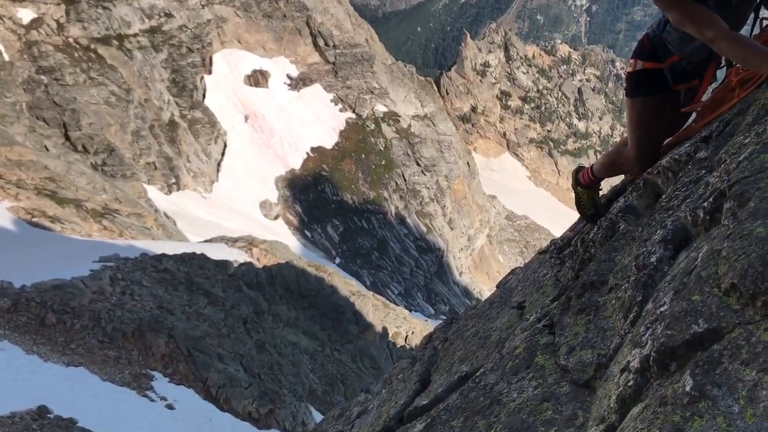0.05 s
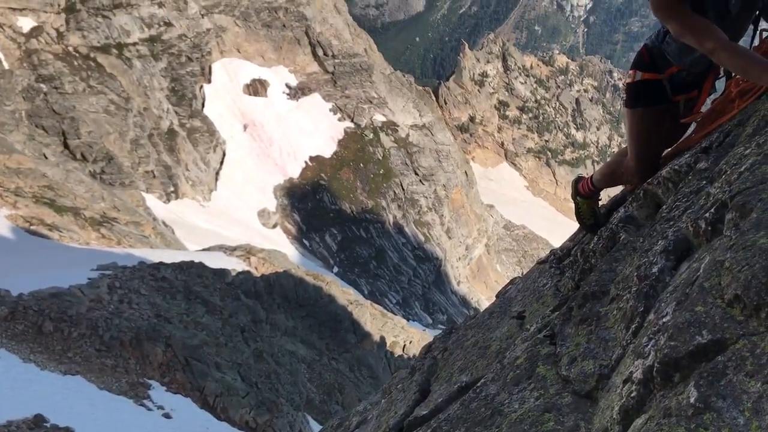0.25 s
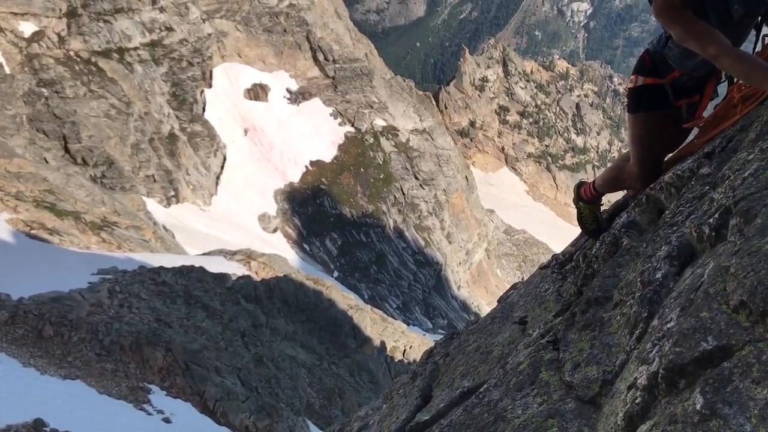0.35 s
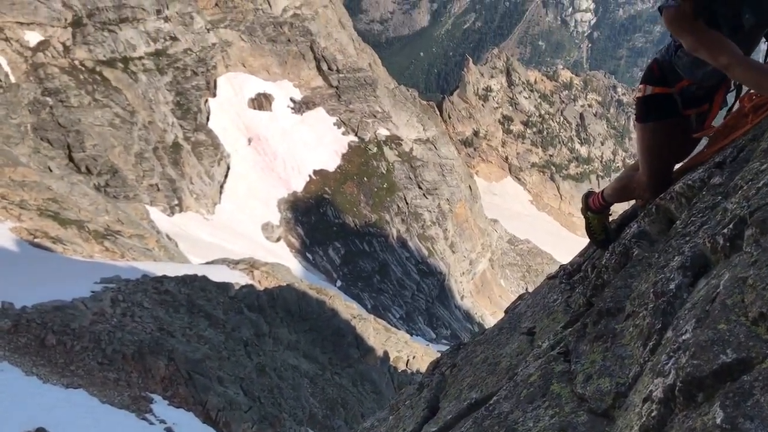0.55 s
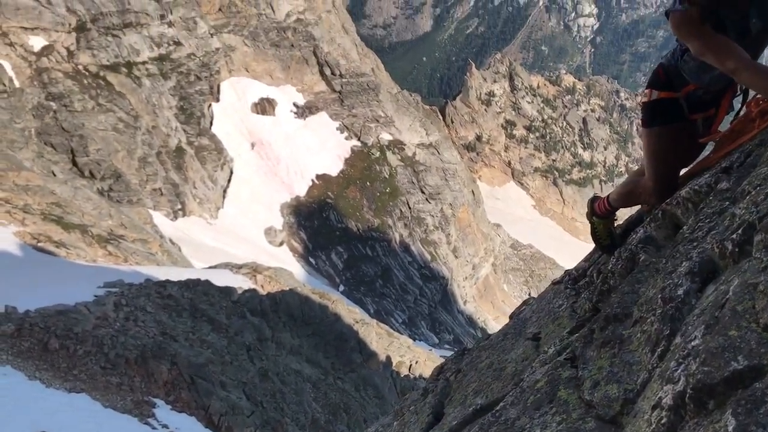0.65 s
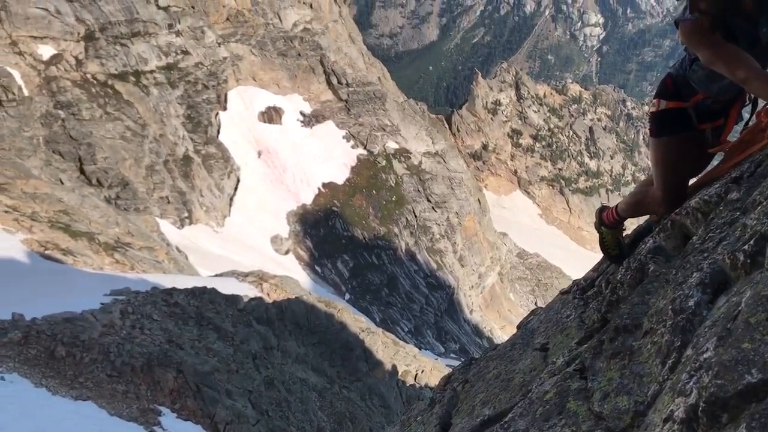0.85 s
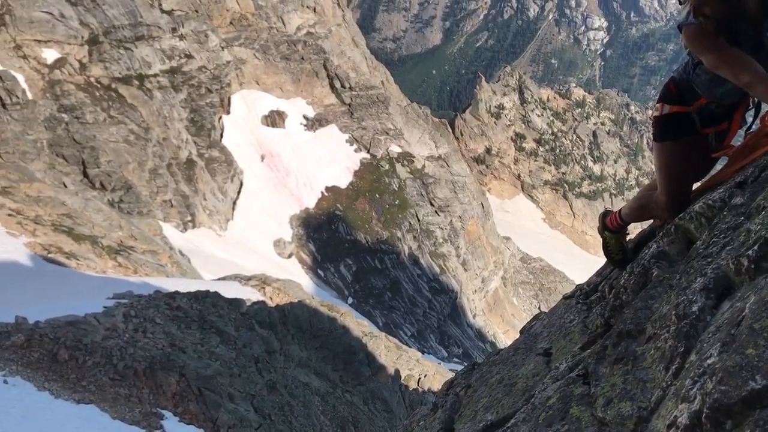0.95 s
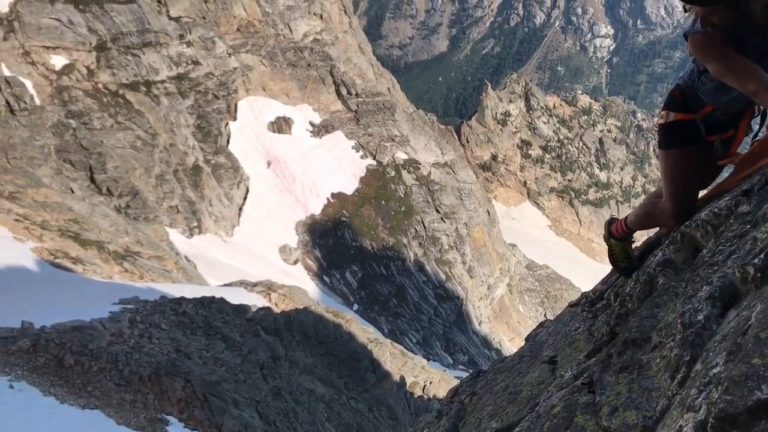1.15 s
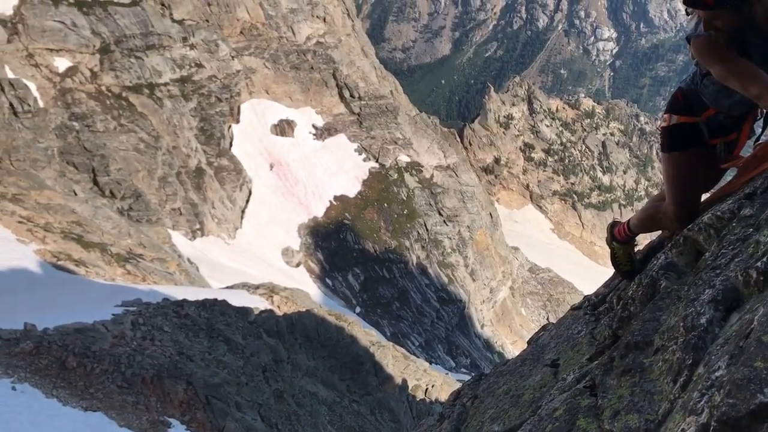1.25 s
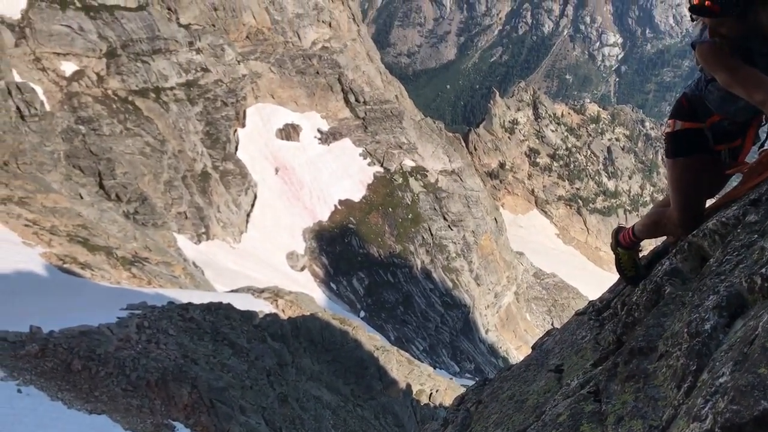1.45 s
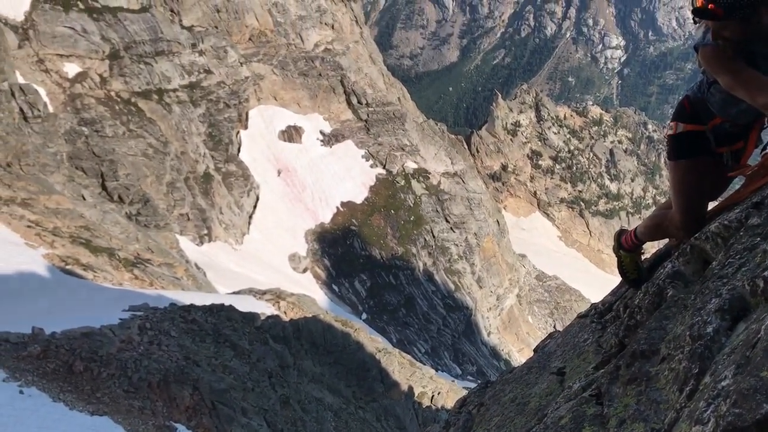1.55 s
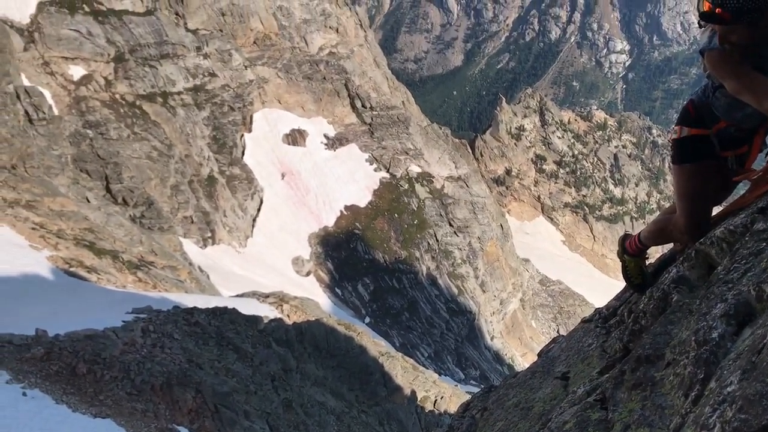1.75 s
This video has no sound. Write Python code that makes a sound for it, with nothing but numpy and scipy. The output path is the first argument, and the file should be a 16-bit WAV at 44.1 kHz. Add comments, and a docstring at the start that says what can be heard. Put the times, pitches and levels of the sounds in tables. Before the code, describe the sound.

Loose rocks knock and scrape on a mountain slope. A sharp clack starts a quick clatter with dull thuds and crunching grit, then a lone clack and a sparser cluster follow. The sound is fairly close, with faint wind behind.

```python
"""Loose rocks on a mountain slope

Blocks knock and ring briefly, small stones clack, and the rubble thuds as it takes the weight.
Sliding faces grind or rub; between them grit snaps and crushed sand sprays out.
Every contact scatters briefly among the boulders. A faint wind and an even hiss lie behind."""
import sys
import numpy as np
from scipy import signal
from scipy.fft import rfft, irfft
from scipy.io import wavfile

SR = 44100
rng = np.random.default_rng(int(sys.argv[2]) if len(sys.argv) > 2 else 0)


def wav_record(signal):
    """Record a signal, one row per channel, as 16-bit PCM in the file named by sys.argv[1]."""
    frames = np.transpose(np.atleast_2d(signal))
    bounded = np.clip(frames, -1, 1)
    # unit amplitude maps onto the largest positive 16-bit level
    quanta = np.round(bounded * 32767).astype(np.int16)
    wavfile.write(sys.argv[1], SR, quanta)


N = 79380
T = np.arange(N) / SR


# Block modes: freq_ratio, level_db, t60_cycles
BLOCK_RESONANCES = [(1, 1.5, 9), (1.24, -1, 8), (1.7, 2, 4.5), (2.25, -1.5, 13.5), (2.8, -2, 12),
                    (3.7, -1, 12.5), (4.9, -6, 19)]
# Block impacts: start_s, level_db, pitch_hz, tilt_db_per_octave; the two soft rows at 0.98 s and 0.986 s are a
# brief dull rub near 1-1.4 kHz, played as short rings
BLOCK_HITS = [(.167, -52, 990, -15), (.207, -41.5, 850, -5), (.2282, -33.5, 750, -6.5),
              (.335, -36.5, 970, -13.5), (.3748, -22.5, 922, -1.5), (.383, -27, 520, -0.5),
              (.402, -33.5, 1000, -12), (.4212, -30.5, 633, 8), (.4245, -31, 716, -7.5),
              (.437, -27, 646, -15), (.443, -29, 707, -10), (.461, -39.5, 844, 5), (.499, -43.5, 700, 1),
              (.5355, -28.5, 935, -4), (0.5366, -31, 1650, -6.5), (.5595, -28, 843, -13),
              (.5685, -29.5, 690, -2.5), (.584, -43, 880, -3), (.6497, -32, 1580, -5),
              (.665, -35.5, 715, -14), (0.7259, -46.5, 1430, -8), (.823, -48, 750, -6),
              (0.98, -50.5, 1040, -6), (.986, -48, 1390, -11), (1.066, -49, 590, -16),
              (1.1672, -28, 1508, -13.5), (1.1685, -35, 715, 4.5), (1.2215, -44.5, 810, 3),
              (1.274, -50, 890, 6), (1.3215, -40, 1170, -2.5), (1.381, -40, 1410, -7),
              (1.4472, -34.5, 850, -13), (1.464, -42, 846, -11), (1.4878, -27, 807, -0.5),
              (1.501, -40, 670, -17), (1.597, -44.5, 1320, -3)]

def knocks():
    """Blocks meet on rough, crumbling faces and ring for a few cycles; two soft rings near 0.98 s make a brief
    dull rub."""
    out = np.zeros(N)
    level_span_s = 0.0021   # energy equals that of a sine this long at level_db
    for start_s, level_db, pitch_hz, tilt_db in BLOCK_HITS:
        body = ring(BLOCK_RESONANCES, pitch_hz, tilt_db, detune=0.077)
        knock = signal.fftconvolve(body, contact(crumble_s=0.0035, crumble_db=-7.5))
        knock *= np.sqrt(level_span_s * SR / 2) / np.linalg.norm(knock)
        add(out, start_s, from_db(level_db) * knock)
    return out


# Small stone impacts: start_s, level_db, low_hz, high_hz
STONE_HITS = [(0.2279, -15, 1070, 3280), (0.229, -18.5, 677, 2240), (.2325, -13.5, 1337, 3500),
              (.8770, -21.5, 2040, 3560), (.953, -48, 3770, 5630), (1.118, -47, 1400, 4500),
              (1.138, -43, 2600, 3900), (1.1665, -28, 3000, 4260), (1.2222, -35, 2640, 4200),
              (1.242, -48, 2600, 4150), (1.381, -39.5, 2150, 2980), (1.400, -44.5, 2000, 3070)]

def clacks(edge_db=-16):
    """Small stones stop dead: one hard pulse with a thin broadband edge."""
    out = np.zeros(N)
    for start_s, level_db, low_hz, high_hz in STONE_HITS:
        touch = contact(crumble_s=0.00056, crumble_db=-19)
        clack = band(touch, low_hz, high_hz) + from_db(edge_db) * touch
        add(out, start_s, from_db(level_db) * clack)
    return out


# Ground modes: freq_ratio, level_db, t60_cycles
GROUND_RESONANCES = [(1, 0.5, 10), (1.55, -4.5, 15), (2.7, -16, 17.5)]
# Weight landing on the slope: start_s, level_db, pitch_hz
LANDINGS = [(0.2289, -34, 223), (0.263, -45, 81.4), (.376, -24.5, 218), (0.381, -28, 77.6), (0.41, -30, 53),
            (.422, -38, 171), (.437, -30, 228), (0.497, -37.5, 58.3), (0.503, -43, 208), (.537, -30, 215),
            (.558, -36.5, 84.5), (0.572, -46, 228), (0.653, -36, 212), (.659, -31.5, 224), (.668, -33, 198),
            (.677, -30.5, 83.5), (0.792, -46.5, 60), (0.877, -48, 49), (1.168, -38.5, 213),
            (1.2209, -31, 161), (1.255, -45.5, 76.6), (1.3209, -38, 202), (1.381, -53, 139),
            (1.468, -46, 110), (1.486, -37.5, 90), (1.586, -42.5, 135), (1.62, -46, 99)]

def thuds(attack_s=0.0016):
    """The rubble takes the weight and answers with low, damped modes."""
    out = np.zeros(N)
    onset = 1 - np.exp(-T[:SR // 4] / attack_s)
    for start_s, level_db, pitch_hz in LANDINGS:
        ground = ring(GROUND_RESONANCES, pitch_hz, tilt_db=0, detune=0.1)
        add(out, start_s, from_db(level_db) * onset * ground)
    return highpass(out, cutoff_hz=45.5, order=2)


# Snapping grit: start_s, peak_db, high_hz
GRIT_SNAPS = [(0.17, -49.5, 12500), (0.3142, -42.5, 11400), (.375, -31.5, 9230), (.3998, -33.5, 6700),
              (.4215, -33, 9900), (.437, -37, 8800), (.5855, -40.5, 6800), (0.6433, -39.5, 15100),
              (0.65, -57, 8000), (.665, -43, 8000), (0.8049, -38.5, 15900), (1.168, -36, 8000),
              (1.275, -52, 10900), (1.3223, -45, 8950), (1.448, -45, 8000), (1.455, -46, 9900),
              (1.4633, -41.5, 10000), (1.4853, -40, 8000), (1.4878, -28, 6940)]

def ticks():
    """Grit snaps between the faces in short, bright bursts."""
    out = np.zeros(N)
    for start_s, peak_db, high_hz in GRIT_SNAPS:
        snap = contact(crumble_s=0.00066, crumble_db=-1.5)
        add(out, start_s, from_db(peak_db) * band(snap, low_hz=4500, high_hz=high_hz))
    return out


# Grinding spectrum: freq_hz, density_db
GRIND_SPECTRUM = [(100, -1), (230, 9), (450, -0.5), (850, -3), (1300, -3), (2200, -9), (3600, -12),
                  (6000, -21), (9000, -28.5), (15000, -37)]
# Rock sliding on rock: start_s, length_s, level_db, tilt_db_per_octave
SLIDES = [(0.17, 0.12, -62.5, 1), (0.331, 0.011, -47, -0.5), (0.372, 0.04, -45.5, 0.5),
          (0.411, 0.044, -46, 1.5), (0.532, 0.053, -46, 0.5), (0.628, 0.055, -52, 1.5),
          (0.726, 0.12, -61.5, 0), (1.115, 0.082, -62, 3), (1.224, 0.045, -58, 2),
          (1.321, 0.009, -55.5, 3.5), (1.444, 0.055, -48, 0.5), (1.596, 0.034, -60.5, 0.9)]

def scrapes(attack_s=0.0038, release_s=0.015, pivot_hz=1000):
    """A sliding rock grinds in dense, uneven slips."""
    out = np.zeros(N)
    for start_s, length_s, level_db, tilt_db in SLIDES:
        spectrum = [(hz, db + tilt_db * np.log2(hz / pivot_hz)) for hz, db in GRIND_SPECTRUM]
        attack = np.clip((T - start_s) / attack_s, 0, 1)
        release = np.exp(-np.maximum(T - start_s - length_s, 0) / release_s)
        out += from_db(level_db) * attack * release * grains(spectrum, rate_per_s=2500)
    return out


# Smooth faces rubbing: centre_s, half_width_s, level_db
RUB_SWELLS = [(0.201, 0.065, -70), (0.826, 0.033, -57), (0.997, 0.038, -60.5), (1.078, 0.024, -63),
              (1.185, 0.016, -50.5), (1.624, 0.034, -61.5)]

def rubs():
    """Smooth faces rub: dull noise that swells and fades."""
    noise = unit_rms(band(rng.standard_normal(N), low_hz=750, high_hz=2000))
    return noise * sum(from_db(level_db) * np.exp(-((T - centre_s) / half_width_s) ** 2)
                       for centre_s, half_width_s, level_db in RUB_SWELLS)


# Sand spectrum: freq_hz, density_db
SAND_SPECTRUM = [(1500, -15), (4000, 9.5), (6500, 3), (9500, -4), (11000, -3), (15000, -9)]
# Sand sprays: start_s, level_db
SAND_SPRAYS = [(0.232, -56.5), (.376, -59), (0.421, -49), (.438, -64.5), (0.461, -61), (.655, -70),
               (1.168, -57), (1.322, -70), (1.488, -61)]

def sand(decay_s=0.027):
    """Crushed sand sprays out after a blow in a fine, dying crackle."""
    envelope = sum(from_db(level_db) * (T > start_s) * np.exp(-np.abs(T - start_s) / decay_s)
                   for start_s, level_db in SAND_SPRAYS)
    return envelope * grains(SAND_SPECTRUM, rate_per_s=1600)


# Near and far reflections: gain_db, t60_s
ECHO_TAILS = [(-6.5, 0.031), (-9.5, 0.18)]
# Reflection response: freq_hz, gain_db
ECHO_SPECTRUM = [(60, -3.5), (300, -8), (1000, 5.5), (3000, 0), (6000, -2.5), (15000, 1.5)]

def boulder_echoes(rocks, delay_s=0.00078):
    """Many small reflections off the surrounding boulders merge into short tails."""
    t = T[:SR // 2]
    response = np.zeros(len(t))
    for gain_db, t60_s in ECHO_TAILS:
        decay = np.exp(-np.log(1000) * t / t60_s) * (t > delay_s)
        tail = coloured(rng.standard_normal(len(t)), ECHO_SPECTRUM) * decay
        energy_norm = np.sqrt(2 * np.log(1000) / (t60_s * SR))
        response += from_db(gain_db) * energy_norm * tail
    return signal.fftconvolve(rocks, response)[:N]


# Wind spectrum: freq_hz, density_db
WIND_SPECTRUM = [(20, -35), (32, -5), (48, 2.5), (90, -1), (160, -6), (290, -5), (450, -13), (1000, -16.5),
                 (2000, -24), (4000, -29), (8000, -42.5)]
# Wind envelope: time_s, level_db
WIND_ENVELOPE = [(0, -61.5), (.15, -63.5), (.5, -50), (.8, -55.5), (1.0, -59.5), (1.3, -54.5),
                 (1.65, -54.5), (1.8, -59.5)]

def wind(gust_db=3, gust_cutoff_hz=13.7):
    """A soft, low rush, made slightly lumpy by quick gusts."""
    smoothing = signal.butter(2, gust_cutoff_hz, fs=SR, output="sos")
    gusts = unit_rms(signal.sosfilt(smoothing, rng.standard_normal(2 * N))[N:])
    level_db = np.interp(T, *np.transpose(WIND_ENVELOPE)) + gust_db * gusts
    return from_db(level_db) * unit_rms(coloured(rng.standard_normal(N), WIND_SPECTRUM))


def hiss(level_db=-80.5):
    """A faint, even hiss."""
    return from_db(level_db) * unit_rms(highpass(rng.standard_normal(N), cutoff_hz=3000))


def ring(modes, pitch_hz, tilt_db, detune):
    """Damped modes of a struck body; upper modes randomly detuned, tilt_db per octave."""
    t, out = T[:SR // 4], 0
    for k, (ratio, level_db, t60_cycles) in enumerate(modes):
        hz = pitch_hz * ratio * (1 + detune * rng.normal() * (k > 0))
        gain = (-1) ** k * from_db(level_db + tilt_db * np.log2(ratio))
        decay = np.exp(-np.log(1000) * hz * t / t60_cycles)
        out += gain * decay * np.sin(2 * np.pi * hz * t)
    return out


def contact(crumble_s, crumble_db):
    """A unit impulse at first touch, then a dying spray of tiny fractures."""
    t = T[:SR // 40]
    fractures = highpass(rng.laplace(size=len(t)) * np.exp(-t / crumble_s), cutoff_hz=1280)
    return (t == 0) + from_db(crumble_db) * fractures / np.linalg.norm(fractures)


def grains(spectrum, rate_per_s, spread_db=5):
    """Random clicks of uneven size; rms 1."""
    sizes = from_db(spread_db * np.minimum(rng.exponential(1, N), 4))
    signs = rng.choice([-1, 1], N)
    hits = rng.random(N) < rate_per_s / SR
    return unit_rms(coloured(sizes * signs * hits, spectrum))


def coloured(x, spectrum):
    """Filter by (freq_hz, gain_db) points."""
    hz, db = np.transpose(spectrum)
    bins_hz = np.maximum(np.arange(len(x) + 1) * SR / (2 * len(x)), 1)
    gain = from_db(np.interp(np.log(bins_hz), np.log(hz), db))
    return irfft(rfft(x, 2 * len(x)) * gain)[:len(x)]


def band(x, low_hz, high_hz):
    """Band-pass, scaled to a peak of 1."""
    y = signal.sosfilt(signal.butter(2, [low_hz, high_hz], "band", fs=SR, output="sos"), x + 1e-18)
    return y / np.abs(y).max()


def highpass(x, cutoff_hz, order=1):
    return signal.sosfilt(signal.butter(order, cutoff_hz, "high", fs=SR, output="sos"), x + 1e-18)


def from_db(db):
    return 10 ** (np.asarray(db) / 20)


def unit_rms(x):
    return x / np.sqrt(np.mean(x ** 2) + 1e-20)


def add(out, start_s, sound):
    i = int(start_s * SR)
    out[i:i + len(sound)] += sound[:N - i]


def scene():
    """Rocks, their reflections, wind and hiss; mono."""
    rocks = clacks() + knocks() + thuds() + ticks() + scrapes() + sand() + rubs()
    return (rocks + boulder_echoes(rocks) + wind() + hiss())[None]


def record(dry):
    """Steep low-pass on the top treble."""
    cutoff_hz = 16300
    return signal.sosfilt(signal.ellip(10, .1, 70, cutoff_hz, fs=SR, output="sos"), dry)


dry = scene()
out = record(dry)
wav_record(out)
```